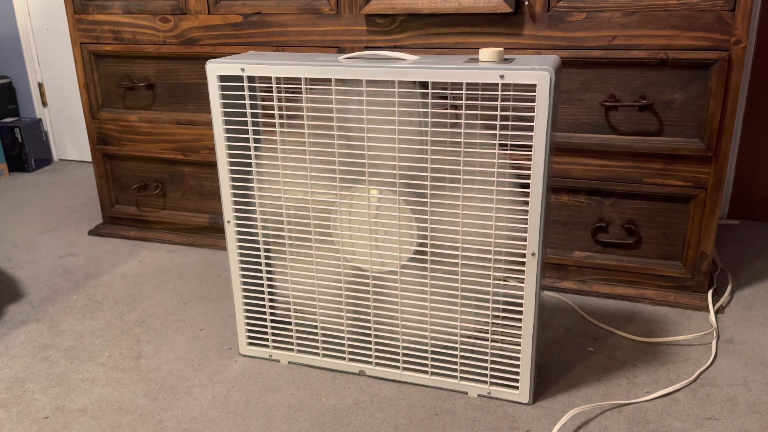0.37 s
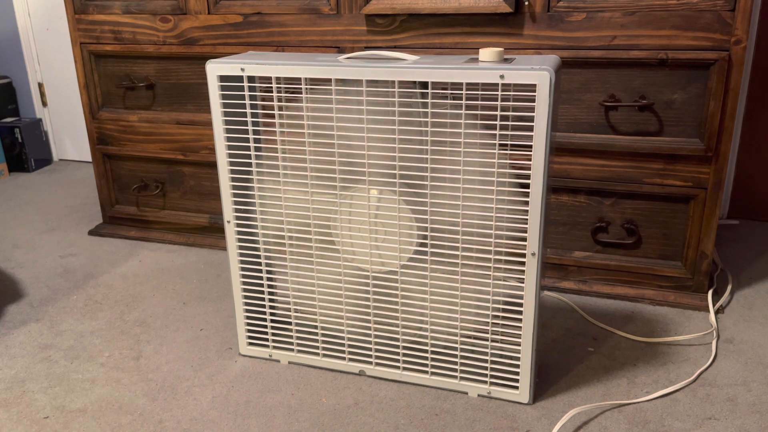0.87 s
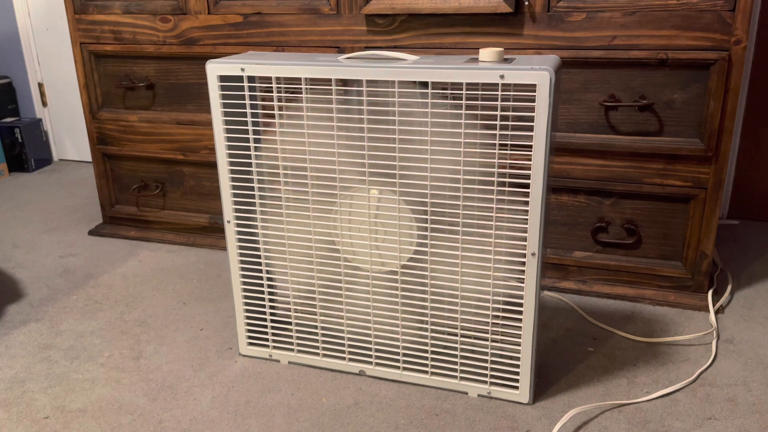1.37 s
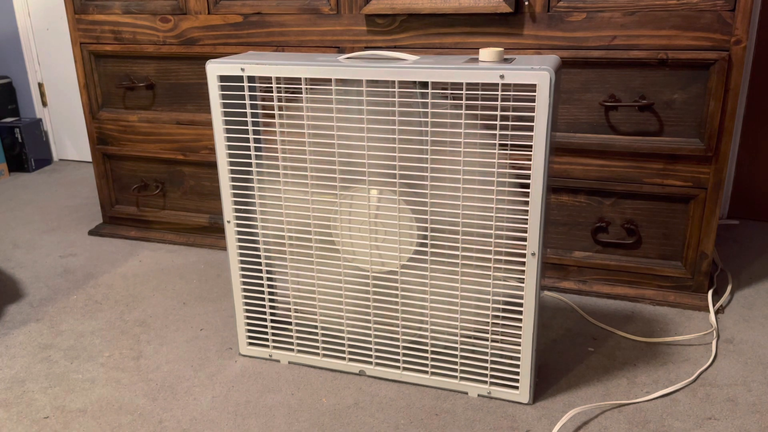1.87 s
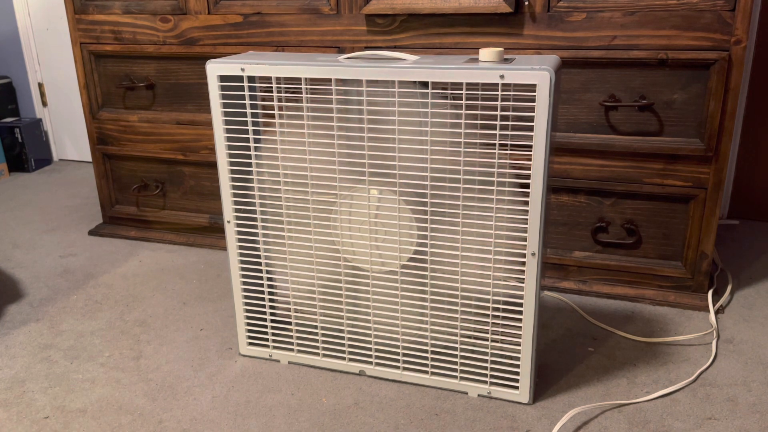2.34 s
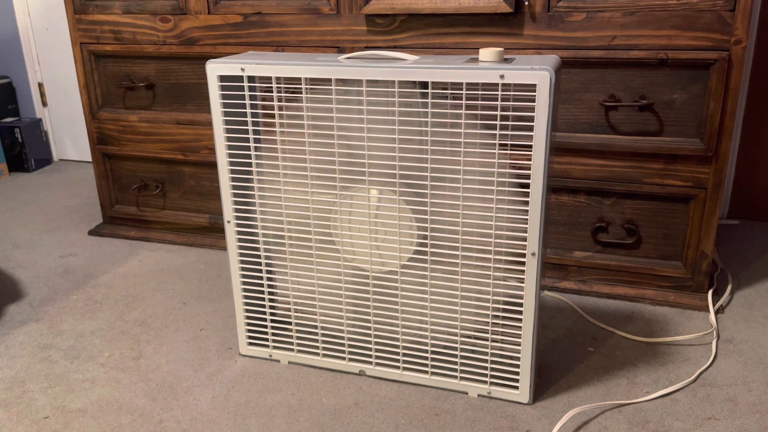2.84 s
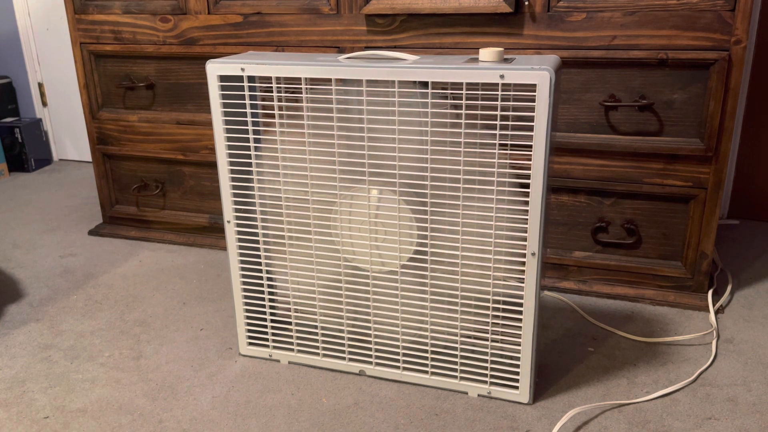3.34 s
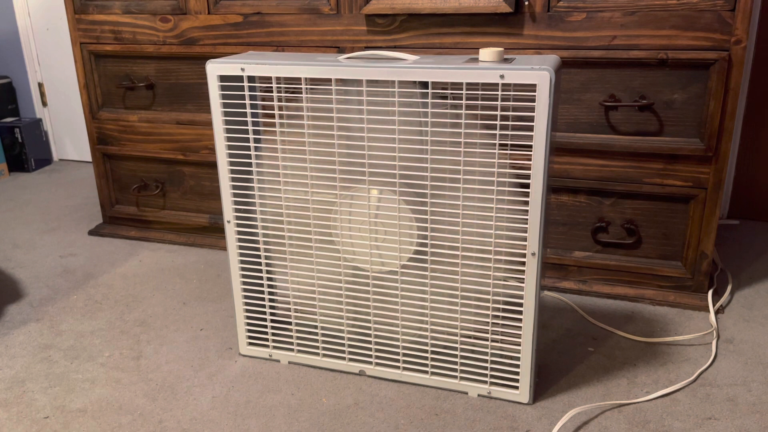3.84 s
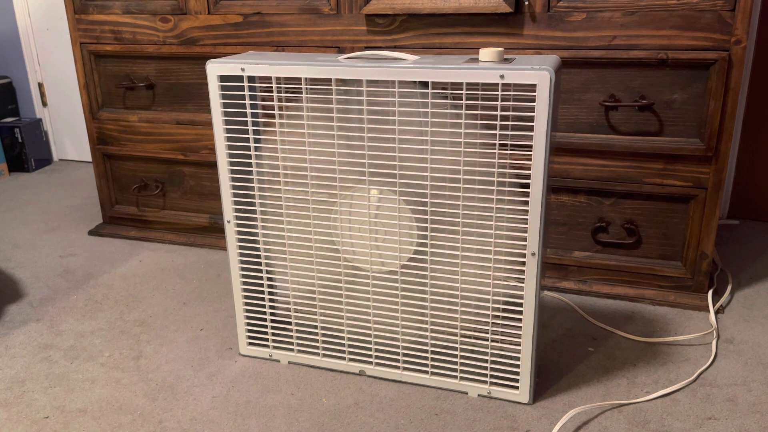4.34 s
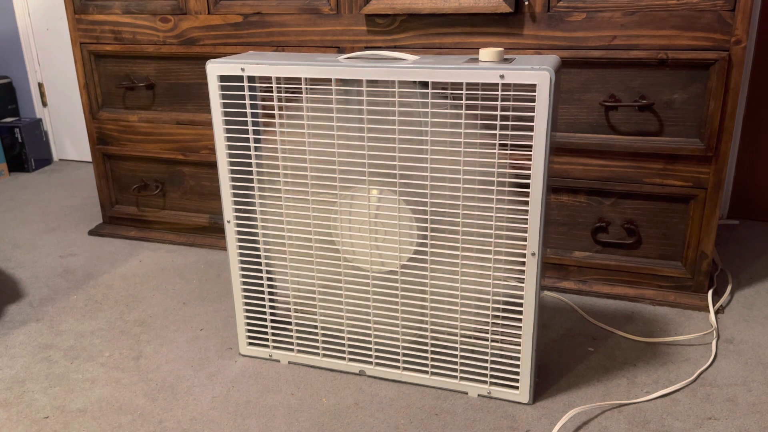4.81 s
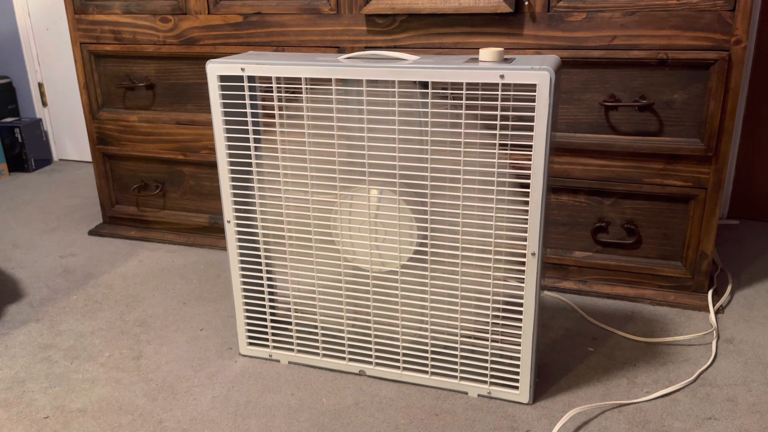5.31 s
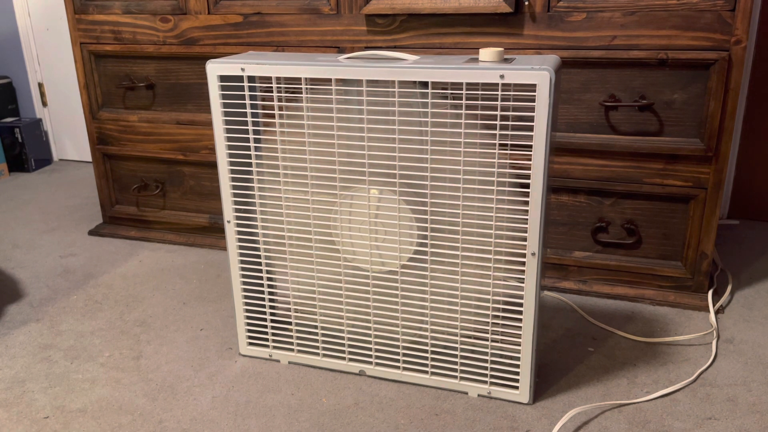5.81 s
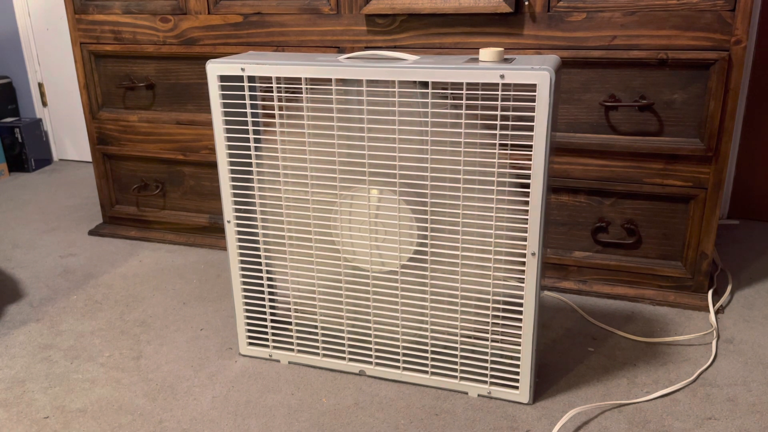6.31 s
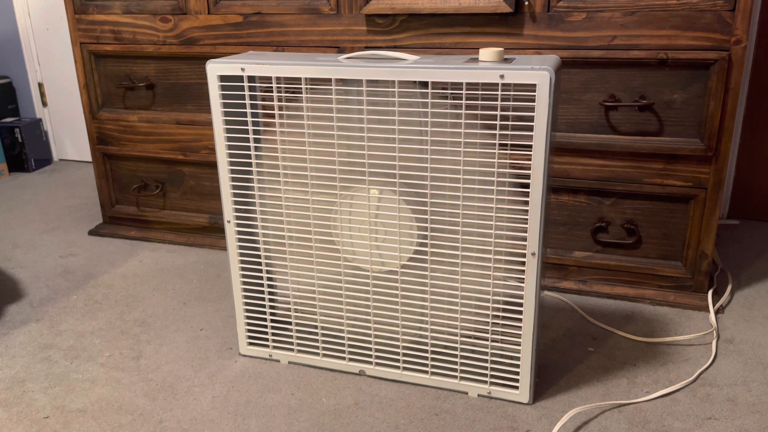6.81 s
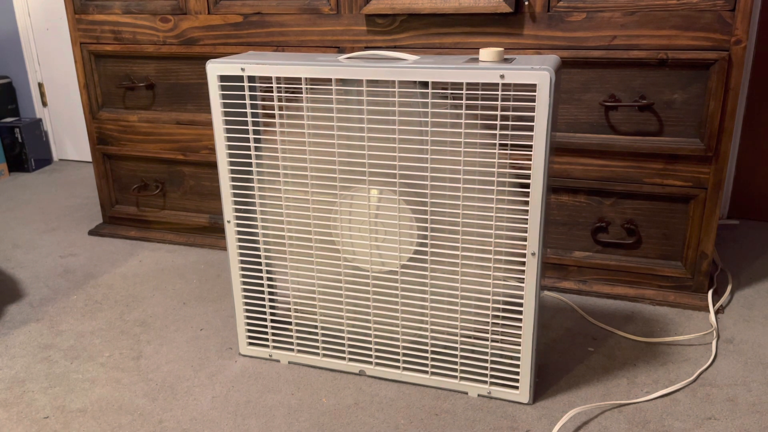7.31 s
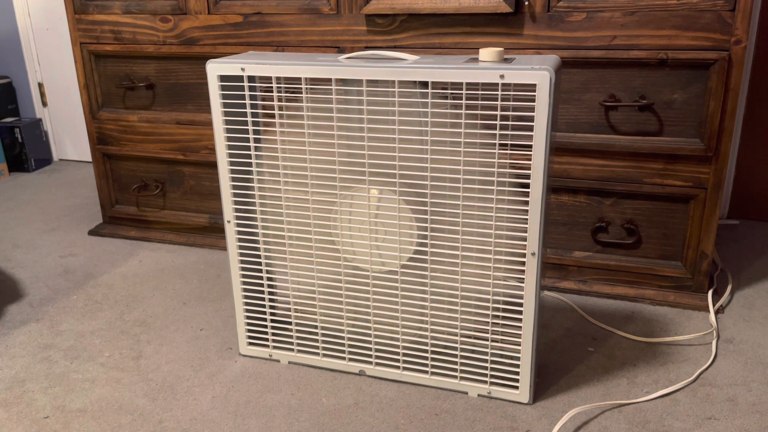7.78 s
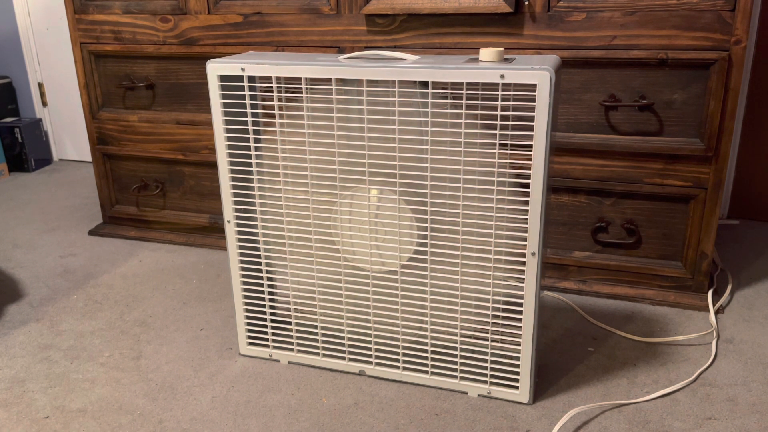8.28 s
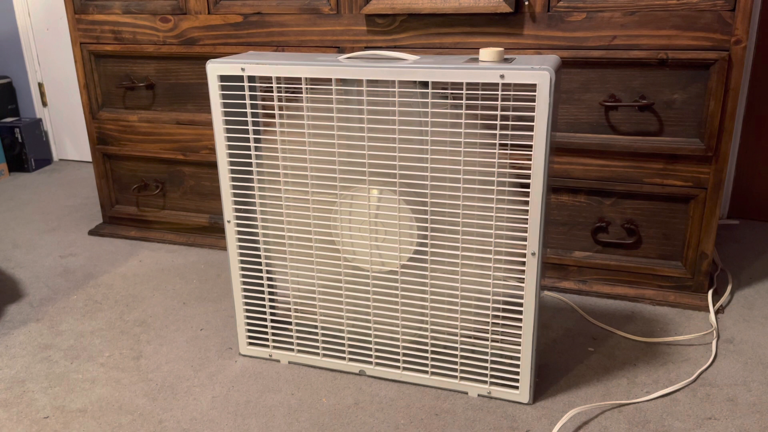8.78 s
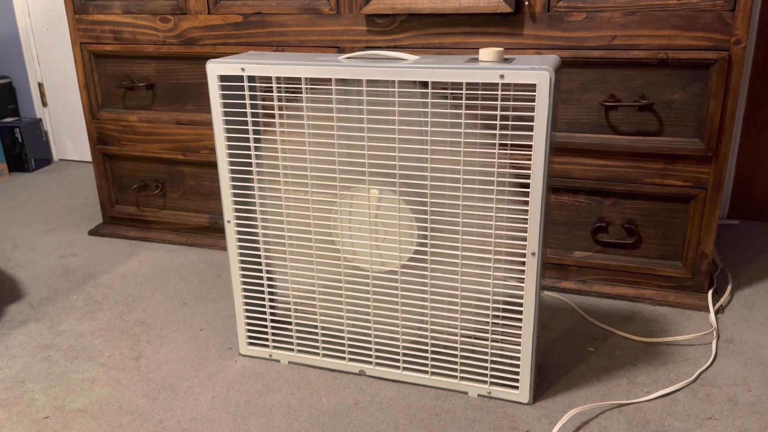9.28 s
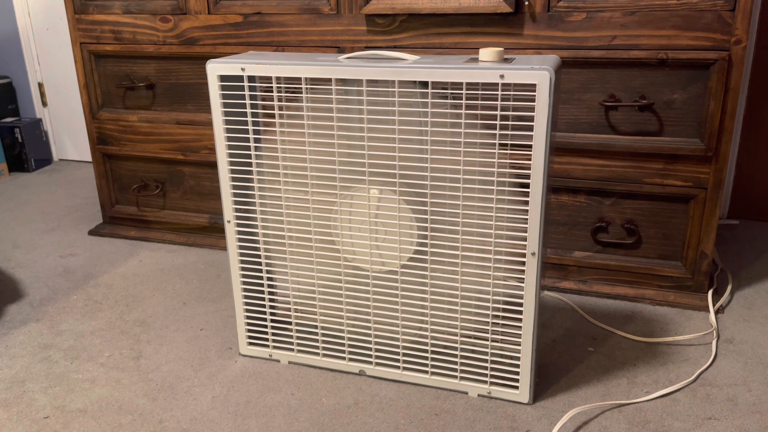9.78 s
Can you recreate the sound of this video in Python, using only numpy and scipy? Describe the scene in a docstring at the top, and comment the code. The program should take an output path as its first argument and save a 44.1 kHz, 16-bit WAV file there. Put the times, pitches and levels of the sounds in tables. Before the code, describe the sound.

Heard from two metres in a small furnished room, a box fan accelerates: quiet, dark whirring becomes a fuller, broader whoosh. Its humming tones glide upward quickly at first, then more slowly, against one fixed low motor hum. Gentle low air bumps mark the start, and barely audible clock ticks and dry clicks hide beneath. Faint steady hiss lies underneath; the stereo sound is close and fairly dry, and the fan never stops.

```python
"""A five-bladed box fan on a carpet gathers speed, two metres from a pair of microphone ports in a furnished room.
Its blades sound a rising stack of tones, each a sine gliding with the passing rate, and shed rushing air:
coloured noise that grows with the speed. The motor hums steadily in pitch at twice the mains rate. Soft low thumps
of air are short cosine bursts; faint clock ticks, once a second for the first 6.5 s, and dry clicks are
noise bursts ringing a small case. A steady hiss lies below."""
import sys
import numpy as np
from scipy import signal
from scipy.fft import rfft, irfft, next_fast_len
from scipy.io import wavfile
from scipy.ndimage import map_coordinates

SR = 44100
rng = np.random.default_rng(int(sys.argv[2]) if len(sys.argv) > 2 else 0)


def gain_from_db(level_db):
    """Turn a decibel level (scalar or array-like) into a linear amplitude factor."""
    decades = np.asarray(level_db, float) / 20
    return 10 ** decades


def transcribe(u):
    """Save the signal u as a 16-bit wav file named by the first command-line argument.

    u: samples, shape (n,) or (channels, n), limited to [-1, 1]; the rate is SR.
    q: integer samples, one column per channel.
    """
    v = np.clip(np.atleast_2d(u).T, -1, 1)
    q = np.round(v * 32767).astype(np.int16)
    wavfile.write(sys.argv[1], SR, q)


N = 436149
T = np.arange(N) / SR
SIZE = next_fast_len(N)
HZ = np.fft.rfftfreq(SIZE, 1 / SR) + 1e-3  # offset keeps log(HZ) finite

FULL_SPEED_HZ = 58.5  # blade passing rate at which speed_db is 0
# part that differs between the ports, against the shared part: f/Hz, level/dB
PORT_DIFFERENCE = [(50, -28), (110, -15.5), (200, -21.5), (350, -10.5), (640, -7.5), (1150, -5),
                   (2080, -5.5), (2800, 0.5), (5500, -1.5), (7000, -1.5), (8700, -8), (9500, 2.5),
                   (10200, 21.5), (10800, 8), (11300, -6.5), (12200, -32.5)]


def at(table, hz):
    """Read (f/Hz, value) rows on a log-frequency axis."""
    f, value = np.transpose(table)
    return np.interp(np.log(hz), np.log(f), value)


def peaks(table):
    """Sum of (f/Hz, width/Hz, level/dB) bells over the spectrum."""
    return sum(db / (1 + ((HZ - hz) / (width_hz / 2)) ** 2) for hz, width_hz, db in table)


def walk(rate_hz, times_s):
    """Random levels joined smoothly, rate_hz new ones a second; spread near 1."""
    levels = rng.standard_normal(400)
    return map_coordinates(levels, [np.clip(times_s * rate_hz, 0, 399)], order=3)


def waver(rate_hz):
    """A slow random walk for every sample."""
    coarse_s = T[::256]
    return np.interp(T, coarse_s, walk(rate_hz, coarse_s))


def ports(shared, apart):
    """Left and right from what the ports share and what differs."""
    return np.array([shared + apart, shared - apart])


def noise(db):
    """Shared and differing parts of a coloured noise; the shared part has rms 1."""
    # share of the difference due to one port hearing first: f/Hz, lead (-1 right first to 1 left first)
    port_lead = [(110, .6), (170, -.5), (240, .6), (285, -.4), (350, .2), (430, -.6), (475, .5), (520, -.3),
                 (620, .3), (730, -.4), (800, .3), (950, .4), (1020, -.3), (1250, .6), (1350, -.2),
                 (2000, .3), (3000, .65), (3700, 0), (5300, -.3), (6000, .2), (7800, .4), (8500, 0),
                 (9300, -.8), (10000, -.5), (10800, .4)]
    shared, stray = rfft(rng.standard_normal((2, SIZE)))
    lead = at(port_lead, HZ)
    quadrature = 1j * lead * shared
    apart = gain_from_db(at(PORT_DIFFERENCE, HZ)) * (quadrature + np.sqrt(1 - lead ** 2) * stray)
    pair = irfft(gain_from_db(db) * np.array([shared, apart]), SIZE)[:, :N]
    return pair / np.std(pair[0])


def tone(phase, db, hz):
    """A wavering sine that reaches the left port a little early."""
    waver_db, waver_hz = .5, 3.
    level = np.sqrt(2) * gain_from_db(db + waver_db * waver(waver_hz))
    wave = level * np.exp(1j * phase)
    return ports(wave.imag, gain_from_db(at(PORT_DIFFERENCE, hz)) * wave.real)


def room_db():
    """Colour of housing and room: resonances, cancellations and one wall echo that combs."""
    # resonances and cancellations: f/Hz, width/Hz, level/dB
    modes = [(52.4, 8.8, 4.5), (79, 22.4, 0), (131, 18.6, -6), (186.4, 30, 3.5), (260, 23.3, 6),
             (278, 20, -4.5), (336, 47, 1.5), (460, 40, -2), (572.5, 97, 6), (690, 40, 3.5), (745, 150, 4),
             (926, 54, -3), (1072, 41, 4), (1130, 50, -0.5), (1283, 60, -3), (1480, 330, 3),
             (1530, 50, 3.5), (863, 20, 2.5), (609, 23, 2.5), (1104, 20, 2), (930, 20, 3), (1720, 25, 1.5),
             (1774, 80, -3), (1966, 200, 3), (2115, 55, -2), (2260, 34, -2), (2290, 80, 3), (2590, 78, -1)]
    echo_s, echo_db, echo_top_hz = .01293, -18, 1300.
    echo = gain_from_db(echo_db) / (1 + (HZ / echo_top_hz) ** 2) * np.exp(-2j * np.pi * HZ * echo_s)
    return peaks(modes) + 20 * np.log10(abs(1 + echo))


def hiss():
    """Still room and microphone hiss: steady coloured noise."""
    # spectrum shape: f/Hz, density/dB per Hz
    hiss_shape = [(300, -4.5), (2000, -5), (3600, 0.5), (4500, -15), (6500, -3), (7100, -9.5), (8600, -7),
                  (9000, -4.5), (9500, -10), (10000, -21.5), (10600, -16.5), (11100, -9.5), (12000, -4.5),
                  (12600, -32), (16000, -43)]
    shared_rms_db = -85
    return gain_from_db(shared_rms_db) * ports(*noise(at(hiss_shape, HZ)))


def blows(events, t60_s, echo_db, echo_t60_s):
    """Envelope of sudden blows, each with a room tail."""
    s, db = np.transpose(events)
    hits = np.zeros(N)
    hits[(s * SR).astype(int)] = gain_from_db(db)

    def fall(fall_t60_s):
        return signal.lfilter([1], [1, -np.exp(-np.log(1000) / (fall_t60_s * SR))], hits)

    return fall(t60_s) + gain_from_db(echo_db) * fall(echo_t60_s)


def knocks():
    """Ticks and clicks: short blows of noise with room tails, ringing a small stiff case."""
    # clock ticks: t/s, relative level/dB
    ticks = [(0.474, -72.5), (1.4738, -81), (2.4758, -71), (3.4685, -73.5), (4.4737, -72), (5.474, -76),
             (6.476, -69)]
    # stepping gear catches and settles within one tick: delay/s, level/dB
    tick_parts = [(-.005, -3), (0, 7.5), (.017, 0), (.03, -13)]
    # faint dry clicks in the room: t/s, relative level/dB
    clicks = [(0.4469, -75), (1.7749, -66), (2.0494, -69), (3.261, -67), (3.9104, -73), (4.2594, -72),
              (4.6493, -69)]
    # case resonances: f/Hz, level/dB, t60/s
    case_modes = [(4800, -9, .006), (5740, -11, .008), (6670, -2, .014), (7750, -3, .01), (8290, -7, .012),
                  (9000, -2, .012), (9400, -6, .008)]
    case_top_hz, gain_db = 9600, 9.5
    parts = [(s + delay, db + part_db) for s, db in ticks for delay, part_db in tick_parts]
    env = blows(parts, .025, -11.5, .15) + blows(clicks, .012, -18., .1)
    colour = sum(gain_from_db(db) / (1 + 2j * np.pi * (HZ - hz) * t60 / np.log(1000)) for hz, db, t60 in case_modes)
    colour = colour / (1 + (HZ / case_top_hz) ** 40)
    struck = env * rng.standard_normal((2, N))
    rung = irfft(rfft(struck, SIZE) * colour, SIZE)
    return gain_from_db(gain_db) * rung[:, :N]


def thumps():
    """Lumps of air land as a cycle or two of low pressure, alike at both ports."""
    # t/s, 1/e half-length/s, f/Hz, peak level/dB
    lumps = [(.392, .016, 52, -35), (.51, .03, 52, -36), (.845, .014, 70, -35), (1.03, .025, 62, -38),
             (1.27, .02, 57, -38), (9.02, .04, 48, -33)]
    return sum(gain_from_db(db) * np.exp(-((T - s) / length) ** 2) * np.cos(2 * np.pi * hz * (T - s))
               for s, length, hz, db in lumps)


def motor(speed_db):
    """The magnetic pull in the windings pulses at twice the mains rate."""
    # f/Hz, rms level/dB at FULL_SPEED_HZ, power of speed
    hum = [(119.9, -49.5, 2.2)]
    return sum(tone(2 * np.pi * hz * T, db + power * speed_db, hz) for hz, db, power in hum)


def unrest(hz, s):
    """Level changes of the rush/dB: slow as a whole, gusty in the treble, flickering band by band."""
    # brief swells and dips: t/s, 1/e half-length/s, f/Hz, 1/e half-width/octaves, level/dB
    level_swells = [(1.14, 0.056, 3620, 0.27, 8.5), (2.04, .04, 6000, .5, 3), (3.33, .03, 4500, .5, 3),
                    (4.67, .04, 8000, .5, 2), (5.4, .45, 55.3, 0.36, -6), (5.4, 1.2, 7500, 1.2, 1.1),
                    (3.6, 1.4, 45, .6, -2), (8.7, .7, 45, 0.5, 3.5), (6.5, 0.19, 50, 0.6, 5),
                    (7.298, 0.17, 50, 0.67, 6.5), (8.154, 0.15, 50.3, 0.39, 8.5),
                    (8.346, 0.058, 49, 0.65, -20)]
    whole_db, gust_db, low_db, high_db = .1, .7, .8, .55  # spreads; flicker is low_db in the bass, high_db above
    whole_rate_hz, gust_rate_hz, flicker_rate_hz = 1., 12., 12.
    gust_full_hz, flicker_split_hz = 7900., 600.

    octaves = np.log2(np.maximum(hz, 25) / 25)
    walks = np.array([walk(flicker_rate_hz, s) for _ in range(24)])  # one per half octave
    grid = np.meshgrid(2 * octaves, np.arange(len(s)), indexing="ij")
    flicker = map_coordinates(walks, grid, order=1)
    flicker_db = high_db + (low_db - high_db) / (1 + (hz / flicker_split_hz) ** 2)
    gusts = np.outer(np.clip(hz / gust_full_hz, 0, 1) ** 2, walk(gust_rate_hz, s))
    swells = 0
    for t, length, f, wide, db in level_swells:
        band = np.exp(-(octaves - np.log2(f / 25)) ** 2 / wide ** 2)
        swells = swells + db * np.outer(band, np.exp(-((s - t) / length) ** 2))
    return whole_db * walk(whole_rate_hz, s) + gust_db * gusts + flicker_db[:, None] * flicker + swells


def rush(rate, speed_db):
    """Eddy noise through housing and room grows with speed; each passing blade nods its upper part."""
    # spectrum shape at FULL_SPEED_HZ, before room colour: f/Hz, density/dB per Hz
    rush_shape = [(20, -46), (33, -25), (42, -2), (65, -4), (100, -6.5), (300, -11.5), (460, -23.5),
                  (1300, -26.5), (2200, -33.5), (3660, -45), (6400, -53), (7200, -56.5), (8200, -54),
                  (8600, -56), (9100, -51.5), (9700, -56), (10200, -71), (10900, -60.5), (11700, -68.5),
                  (12500, -90), (16000, -100)]
    # faster blades shed smaller eddies, so the treble grows most: f/Hz, power of speed
    growth = [(40, 0.73), (70, 1.9), (120, 3.4), (165, 2.76), (220, 3.55), (400, 2.94), (700, 3.6),
              (1000, 3.36), (2500, 5.25), (5000, 6.94), (7500, 9.5), (9100, 11.3), (11000, 10.2)]
    rush_db = -37  # shared rms at FULL_SPEED_HZ, before buffeting and unrest
    buffet_top_hz, buffet_db, buffet_rate_hz = 90, 0.14, 10.
    flutter_depth, flutter_above_hz = .05, 1400.

    eddies = noise(at(rush_shape, HZ) + room_db())
    hz, s, frames = signal.stft(eddies, SR, nperseg=2048, noverlap=1536)
    drive_db = rush_db + np.outer(at(growth, hz + 1), np.interp(s, T, speed_db))
    lowest = 1 / (1 + (hz / buffet_top_hz) ** 6)
    drive_db = drive_db + buffet_db * np.outer(lowest, walk(buffet_rate_hz, s))
    frames = frames * gain_from_db(drive_db + unrest(hz, s))
    air = signal.istft(frames, SR, nperseg=2048, noverlap=1536)[1][:, :N]
    upper = signal.sosfilt(signal.butter(2, flutter_above_hz, "high", fs=SR, output="sos"), air)
    nod = np.cos(2 * np.pi * np.cumsum(rate) / SR)
    return ports(*(air + flutter_depth * nod * upper))


def blades(rate, speed_db):
    """Blades sweeping past the frame sound multiples of the passing rate; the room colours them as they rise."""
    # multiples 1 to 7, before room colour: rms level/dB at FULL_SPEED_HZ, power of speed
    tones = [(-49, 3.7), (-45, 2.36), (-57.5, 1.5), (-46, 4.34), (-63, 1), (-58.5, 2.3), (-64.5, 6.)]
    # standing waves a pure tone glides through: f/Hz, width/Hz, level/dB
    standing = [(55, 6.1, 1.5), (85, 9.7, 0), (104, 6.3, -5), (114.2, 5.4, 4.5), (161, 7.2, -4.5),
                (166, 10, 4), (180.3, 14, 3.5), (229, 18, 2), (238.4, 6, -7), (314.4, 19, 6), (344, 12, 5)]
    jitter, jitter_hz = 0.00077, 3.  # relative spread of the rate
    phase = 2 * np.pi * np.cumsum(rate * (1 + jitter * waver(jitter_hz))) / SR
    colour_db = room_db() + peaks(standing)
    stack = 0
    for k, (db, power) in enumerate(tones, 1):
        level_db = db + power * speed_db + np.interp(k * rate, HZ, colour_db)
        stack = stack + tone(k * phase + rng.uniform(0, 2 * np.pi), level_db, k * FULL_SPEED_HZ)
    return stack


def scene():
    """Fan spinning up towards a top rate, with motor, thumps, hiss, clock and clicks."""
    top_hz, gain_hz, settled_s, ease = 59.77, 20.2, 13.7, 2.287
    rate = top_hz - gain_hz * (1 - T / settled_s) ** ease  # blades passing a second
    speed_db = 20 * np.log10(rate / FULL_SPEED_HZ)
    return blades(rate, speed_db) + motor(speed_db) + rush(rate, speed_db) + thumps() + hiss() + knocks()


def low_pass(x):
    """Removes everything above the highest recorded frequency."""
    return signal.sosfilt(signal.butter(12, 12850, fs=SR, output="sos"), x)


def record(dry):
    """The left port faces the fan a little more than the right: a level lean by frequency."""
    # left minus right: f/Hz, level/dB
    port_lean = [(60, -1), (110, 1), (200, 1), (350, 0.5), (640, 3), (1150, 2.5), (2080, 0), (3760, 3.5),
                 (6780, 2.0), (12200, -0.5)]
    edge = 2048  # samples mirrored and tapered at each end, against wrap-around
    wide = np.pad(dry, ((0, 0), (edge, edge)), mode="reflect", reflect_type="odd")
    wide = wide * signal.windows.tukey(N + 2 * edge, edge / N)
    size = next_fast_len(wide.shape[1])
    hz = np.fft.rfftfreq(size, 1 / SR) + 1
    lean = gain_from_db(at(port_lean, hz) * np.array([[.5], [-.5]]))
    mix = irfft(rfft(wide, size) * lean, size)[:, edge:edge + N]
    return low_pass(mix)


dry = scene()
out = record(dry)
transcribe(out)
```